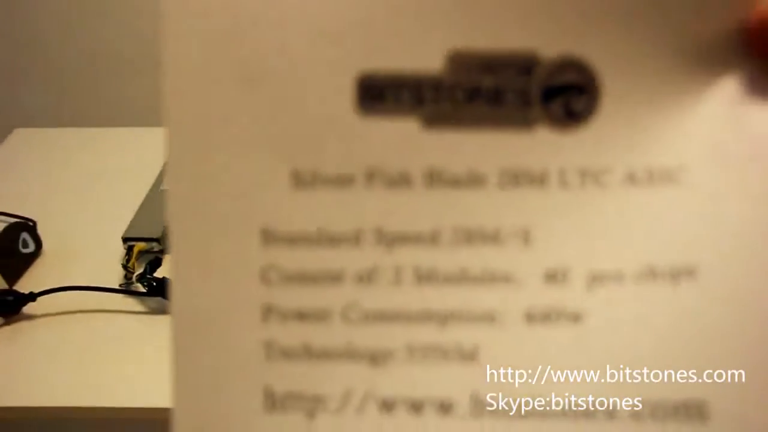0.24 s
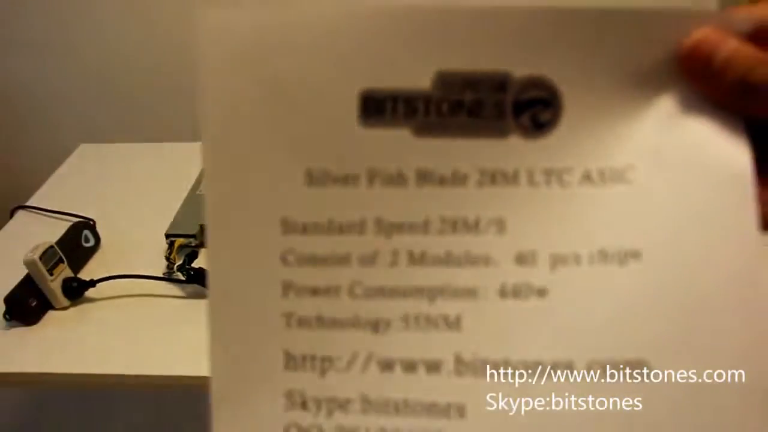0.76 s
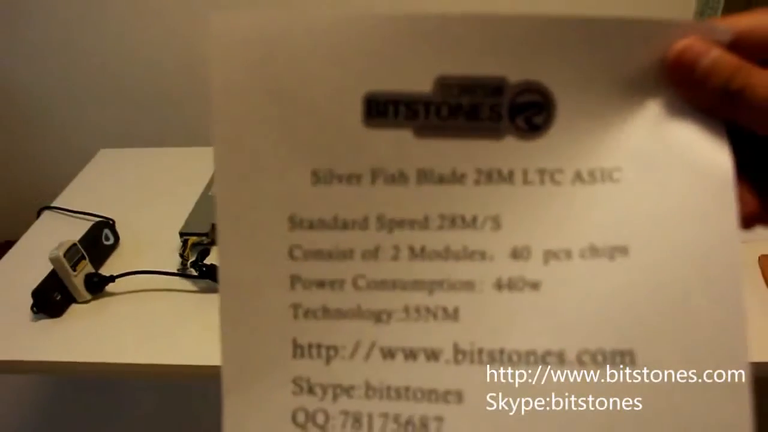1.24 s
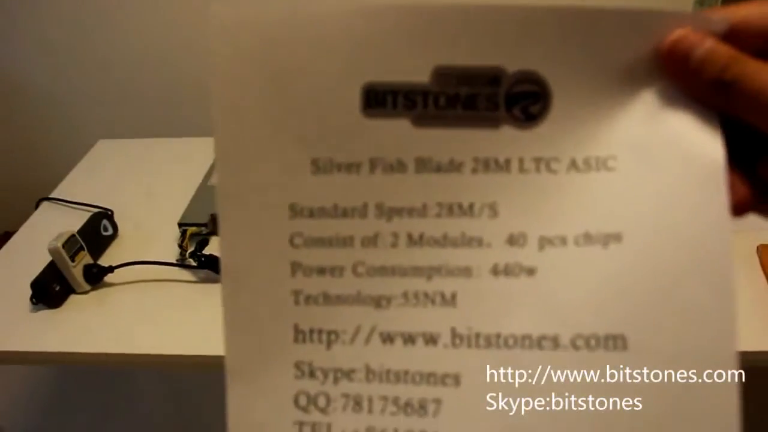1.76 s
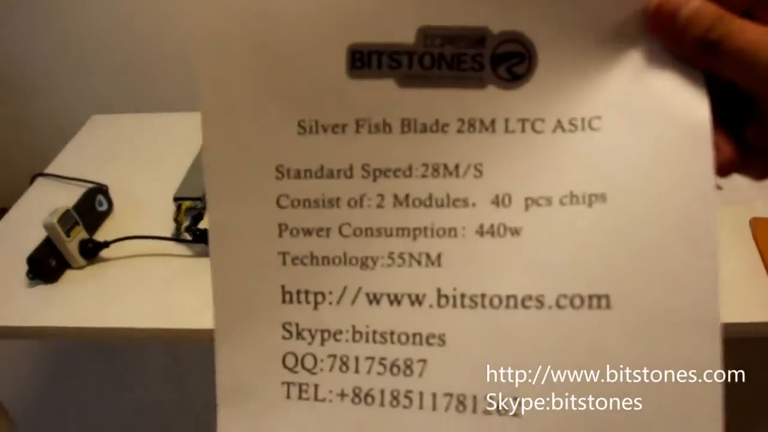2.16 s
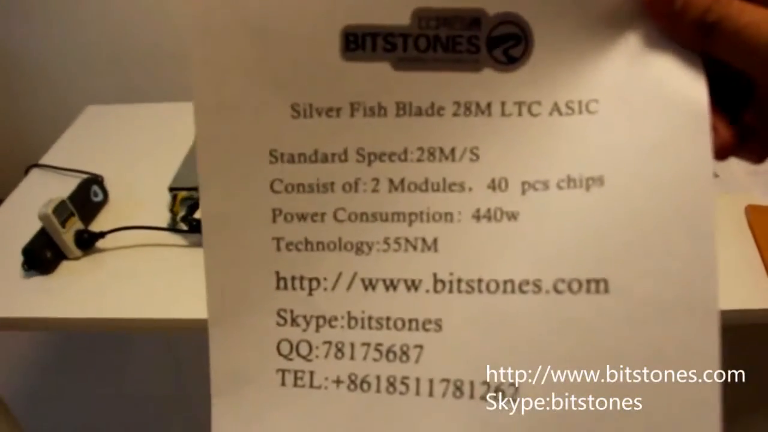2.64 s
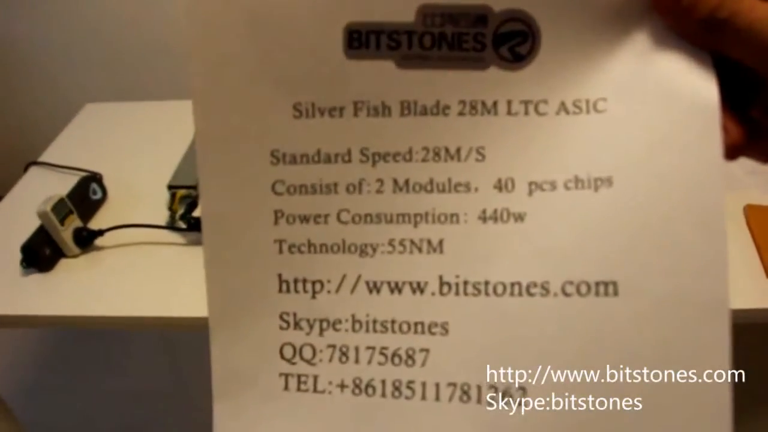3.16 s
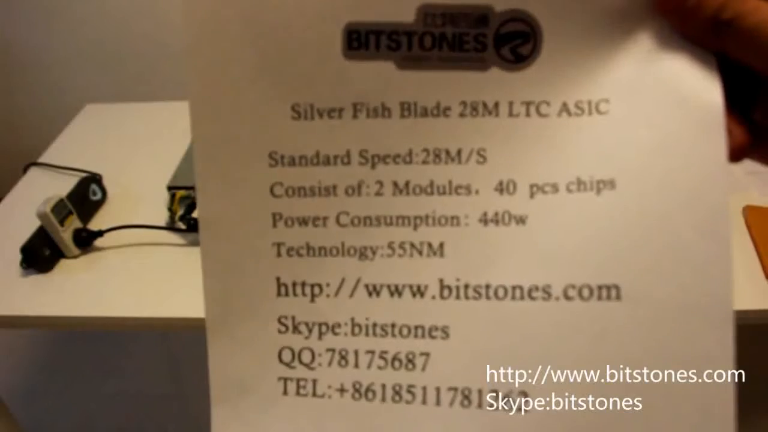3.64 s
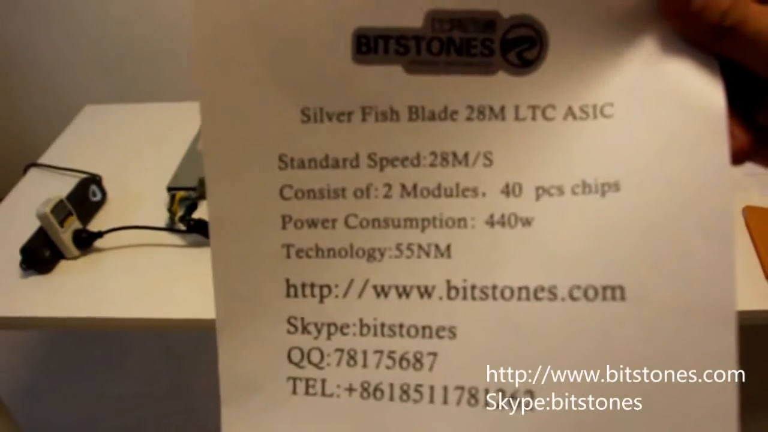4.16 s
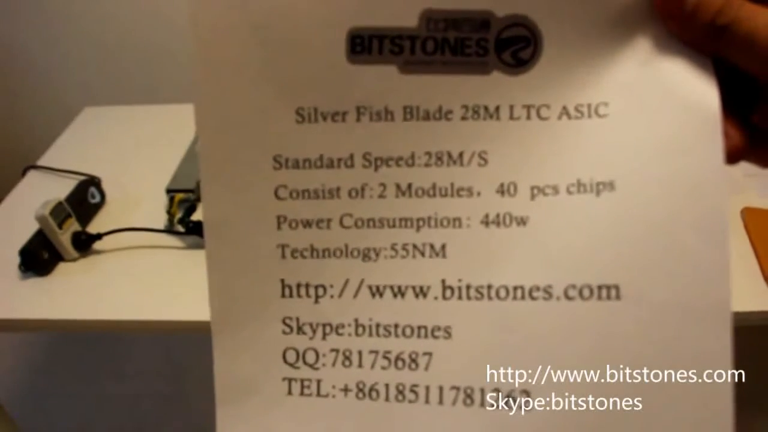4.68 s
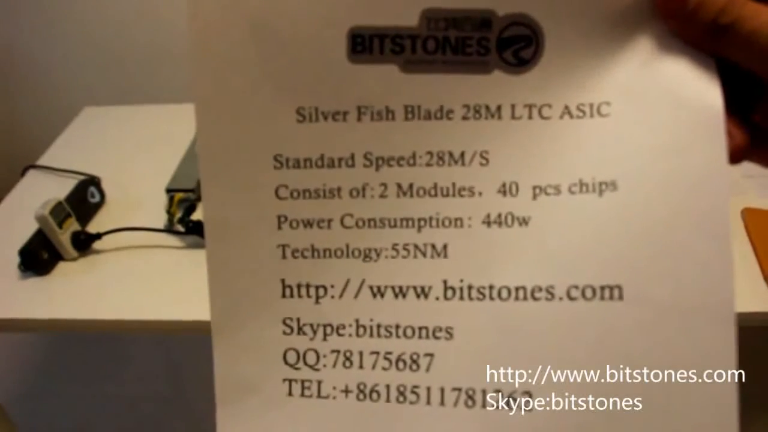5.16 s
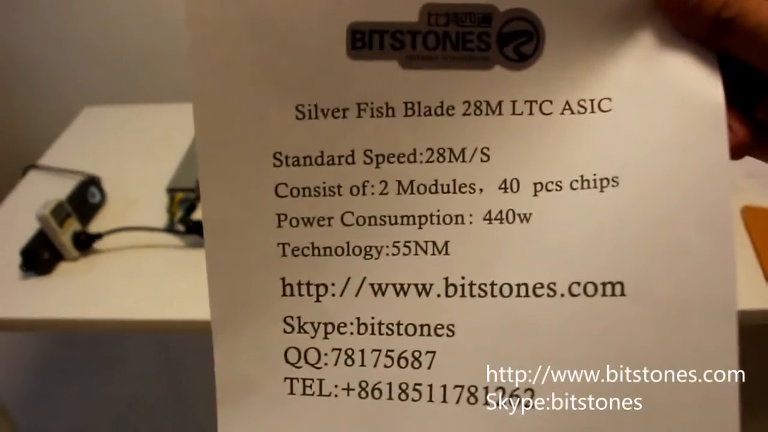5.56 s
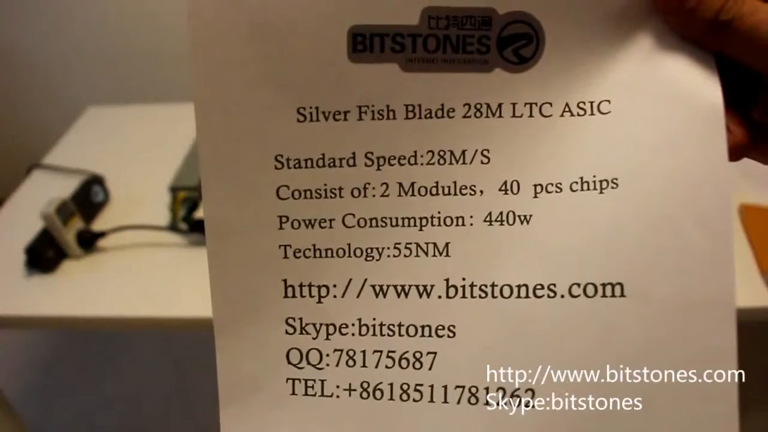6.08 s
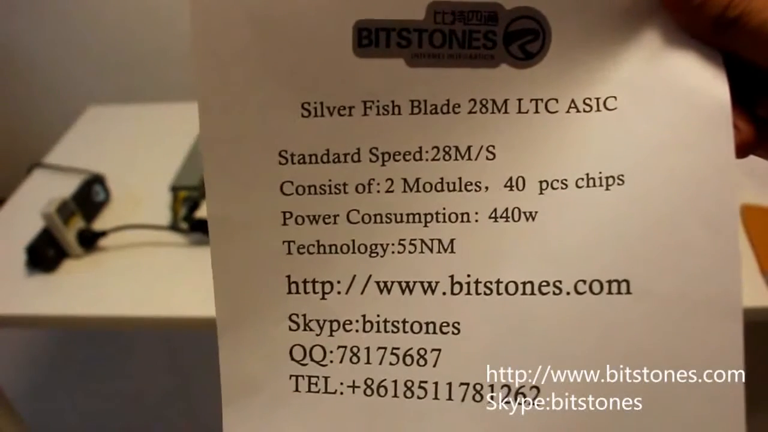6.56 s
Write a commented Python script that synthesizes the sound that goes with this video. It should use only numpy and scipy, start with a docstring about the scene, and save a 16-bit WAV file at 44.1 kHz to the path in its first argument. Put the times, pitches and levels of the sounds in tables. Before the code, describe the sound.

From 0 seconds, two small multi-bladed cooling fans in a computing box on a desk are already running flat out in a small room, and they continue unchanged to the end at about 6.8 seconds. Their main whines sit close together near 675 and 700 hertz, with overtones around 1.4, 2 and 2.8 kilohertz, beating about 23 times a second as a rough, fluttering buzz. An even, wide rush of air fills in around them, strongest in the middle range, with little deep bass and dull at the very top. A faint low burble of short gliding tones, mostly around 300 to 450 hertz, flickers underneath. Between about 1.7 and 2.4 seconds the hand-held microphone eases back and the overtone balance shifts. Single tones dip and swell throughout, notably near 2.7, 3.5 and 6 seconds, while overall loudness stays nearly constant.

```python
"""From the start two seven-bladed cooling fans of a computing box run flat out on a desk in a small room.
Each is a set of sines locked to its shaft; speeds 3% apart drift, so the whines beat about 23 times a second.
Under them lie an even rush of air, made of coloured noise, and a faint low burble of short gliding sines.
At 1.72 s the hand-held microphone eases back for 0.65 s, and the balance of the overtones shifts.
To the end, single lines dip and swell as it passes nodes and crests of standing waves."""
import sys
import numpy as np
from scipy import signal
from scipy.fft import rfft, irfft, next_fast_len
from scipy.io import wavfile
from scipy.ndimage import uniform_filter1d, map_coordinates

SR = 44100
rng = np.random.default_rng(int(sys.argv[2]) if len(sys.argv) > 2 else 0)


def put_to_file(sound):
    """Save the sound as 16-bit audio at rate SR, in the file named by the first command-line argument."""
    columns = np.atleast_2d(sound).T  # one column per channel
    safe = np.clip(columns, -1, 1)
    whole_steps = np.round(safe * 32767)
    wavfile.write(sys.argv[1], SR, whole_steps.astype(np.int16))


N = 300762

BLADES = 7
# fan speed: time_s, blade_pass_hz
SLOW_SPEED = [(0, 677.7), (0.4, 676.9), (1.05, 679.0), (3.2, 674.6), (5, 674.8), (5.6, 675.5),
              (6.82, 673.5)]
FAST_SPEED = [(0, 699.2), (1.8, 698.9), (2.75, 700.8), (3.6, 698.5), (4.8, 697.6), (5.8, 699.5),
              (6.82, 696.7)]
# whine: blade_pass_harmonic, first_place_db, second_place_db, left_minus_right_db
SLOW_WHINE = [(1, -35.8, -37.7, -2.2), (2, -33.7, -37.5, 1.9), (3, -48.5, -40.8, 1.3), (4, -40, -37, 2.1)]
FAST_WHINE = [(1, -31.2, -30.3, .7), (2, -41.7, -40.6, -.2), (3, -49, -45.5, -7), (4, -41, -39.5, .7)]
# weaker lines from unequal blades and the motor: shaft_multiple, level_db (before shaft_db)
SLOW_ORDERS = [(5, -51), (6, -49), (8, -46.5), (9, -49), (11, -53), (12, -54), (32, -55), (35, -55),
               (42, -55), (49, -60), (56, -61), (63, -51)]
FAST_ORDERS = [(6, -42), (9, -45.5), (12, -52), (16, -52), (18, -53), (35, -52.5), (42, -55), (63, -48.3)]
# standing-wave nodes (-) and crests (+) crossed: centre_s, half_length_s, shaft_multiple, change_db
SLOW_CROSSINGS = [(.4, .35, 7, 2), (.45, .25, 28, 2), (1.1, .55, 12, 11), (1.25, .55, 28, -10),
                  (1.3, .2, 5, 6), (1.85, .35, 5, 9), (2.35, .5, 14, 4.5), (2.85, .25, 28, 2),
                  (3.5, .35, 14, -10), (3.5, .2, 8, 7), (3.65, .25, 6, 6), (4.42, .15, 14, -6),
                  (4.55, .4, 8, 8), (4.75, .45, 6, 5), (5.45, .6, 7, 2.5), (5.5, .3, 28, 3),
                  (5.65, .3, 14, 3), (6.2, .1, 14, -12), (6.5, .3, 21, -4), (6.55, .35, 28, -7),
                  (6.55, .4, 7, -3), (6.55, .22, 6, 10)]
FAST_CROSSINGS = [(1.83, .18, 14, 6), (2.2, .25, 28, -4), (2.3, .3, 21, 6), (2.62, .22, 7, -4.5),
                  (2.68, .14, 14, -15), (2.7, .5, 28, -11), (3.1, .17, 7, -7), (3.15, .33, 14, 5),
                  (3.53, .2, 9, 7), (4.9, .45, 9, 5), (5.75, .35, 14, 4.5), (5.9, .2, 7, -3.8),
                  (5.9, .22, 28, -9), (6.65, .3, 14, -4.5)]
ORDER_PAN_SCATTER_DB = 2.5
# likeness of left and right: pitch_hz, likeness (0 to 1)
ALIKE = [(250, 1), (480, 1), (570, 0.89), (740, 0.98), (1000, 0.88), (1700, 0.83), (2500, 0.68),
         (3500, 0.67), (5000, .53), (6500, 0.47)]
# rush of air through the heat sinks: pitch_hz, relative_density_db
AIR_COLOUR = [(470, -6.5), (520, 1), (900, 0.53), (1400, 0.7), (1900, -0.5), (3100, -3), (4400, -6.5),
              (5200, -7), (6430, -9.5), (6520, -19.5), (7000, -33)]
# resonances (+) and reflection notches (-) of case and desk: centre_hz, width_hz, change_db
CASE_COLOUR = [(485, 25, 3), (512, 18, -4), (536, 24, 4.5), (585, 40, 2.5), (640, 25, -1.5), (725, 30, -2),
               (875, 55, 3.4), (950, 60, 2.6), (1025, 40, -1), (1065, 40, 1), (1145, 70, 1.5),
               (1235, 50, 2), (1560, 70, -1.7), (1900, 80, -1.3), (2120, 140, 1), (2620, 60, -1.3),
               (2900, 300, 1.5), (3180, 130, 2.3), (4060, 220, 3)]
LOW_EDGE_HZ, EDDY_DB = 462, 0.6
# upper rush at the microphone's two places
SHADE_FIRST_DB, SHADE_SECOND_DB = 0.9, 1.2
MOVE_START_S, MOVE_LENGTH_S = 1.72, 0.65
# strongest low blips: centre_s, pitch_hz, peak_db (before level_db)
STRONG_BLIPS = [(.15, 293, -42), (.28, 312, -43), (.5, 293, -45), (.67, 293, -43), (.79, 310, -45),
                (.97, 366, -39), (1.03, 304, -43), (1.26, 299, -44), (1.34, 262, -43), (1.35, 361, -41),
                (1.54, 295, -40), (1.68, 304, -43), (1.81, 275, -45), (1.89, 310, -41), (1.97, 361, -40),
                (2.08, 310, -42), (2.17, 393, -37), (2.28, 300, -44), (2.41, 275, -45), (2.54, 326, -43),
                (2.62, 312, -44), (2.75, 299, -45), (2.86, 301, -41), (2.94, 304, -42), (3.15, 307, -41),
                (3.48, 353, -43), (3.82, 312, -44), (3.94, 291, -45), (4.14, 304, -39), (4.25, 222, -46),
                (4.29, 310, -42), (4.67, 299, -46), (5, 388, -37), (5.13, 404, -37), (5.19, 304, -43),
                (5.42, 304, -43), (5.57, 293, -45), (5.65, 304, -42), (5.8, 371, -39), (5.81, 255, -44),
                (6.38, 312, -45), (6.46, 299, -43), (6.63, 299, -37)]
# weak random blips: pitch_hz, pitch_scatter_hz, rate_per_s, peak_db (before scatter and level_db)
WEAK_BLIPS = [(348, 16, 4.5, -44.5), (396, 12, 6, -44.5), (458, 14, 6, -43)]
BLIP_S, WEAK_SCATTER_DB, GLIDE_SCATTER_HZ_PER_S = 0.1, 2.5, 350
TOP_HZ = 7100


def amp(db):
    """Decibels to gain."""
    return 10 ** (np.asarray(db) / 20)


def unit(x):
    """x at rms 1."""
    return x / np.sqrt(np.mean(x ** 2) + 1e-20)


def along(points, hz):
    """Value at hz from (pitch_hz, value) points, read on a log axis."""
    point_hz, values = np.transpose(points)
    return np.interp(np.log(hz + 1), np.log(point_hz + 1), values)


def curve(rows):
    """One value per sample from (time_s, value) rows."""
    time_s, values = np.transpose(rows)
    return np.interp(np.arange(N) / SR, time_s, values)


def wobble(rate_hz):
    """Smooth random curve, rate_hz knots a second."""
    knots = rng.standard_normal(int(N * rate_hz / SR) + 4)
    return map_coordinates(knots, [np.arange(N) * rate_hz / SR], order=2, mode="nearest")


def filtered(x, response):
    """x times a gain that depends on frequency."""
    size = next_fast_len(N + SR // 2)
    hz = np.fft.rfftfreq(size, 1 / SR)
    return irfft(rfft(x, size) * response(hz), size)[..., :N]


def spread(hz):
    """Mid-side angle: the microphone's two ports agree less as the pitch rises."""
    return np.arccos(np.clip(along(ALIKE, hz), 0, 1)) / 2


def moved(first_db, second_db):
    """Level that follows the microphone from its first place to its second."""
    progress = np.clip((np.arange(N) / SR - MOVE_START_S) / MOVE_LENGTH_S, 0, 1)
    return first_db + (second_db - first_db) * progress


def standing_wave(crossings, order):
    """dB by which one line dips or swells as the microphone passes nodes and crests."""
    t = np.arange(N) / SR
    return sum(db * np.exp(-((t - centre_s) / half_s) ** 2)
               for centre_s, half_s, line, db in crossings if line == order)


def tone(phase, hz, flutter_db, pan_db, width):
    """Stereo line of rms about 1: turbulent inflow shakes its strength, reflections part the ports' phases."""
    sides = np.array([[0.5], [-0.5]])
    lead_rad = width * np.tan(spread(hz)) * wobble(0.7)
    gain = amp(flutter_db * wobble(14) + sides * pan_db)
    return np.sqrt(2) * gain * np.sin(phase + sides * lead_rad)


def fan(speed, whine, crossings, orders, shaft_db, flutter_db, wander_db):
    """One rotor: blade-pass harmonics and weaker shaft orders, all locked to its turning."""
    shaft_hz = curve(speed) / BLADES
    angle = 2 * np.pi * np.cumsum(shaft_hz) / SR
    lines = [(BLADES * round(harmonic), moved(first_db, second_db), pan_db)
             for harmonic, first_db, second_db, pan_db in whine]
    for order, db in orders:
        level_db = db + shaft_db + wander_db * wobble(2.5)
        lines.append((order, level_db, rng.normal(0, ORDER_PAN_SCATTER_DB)))
    total = np.zeros((2, N))
    for order, level_db, pan_db in lines:
        phase = order * angle + rng.uniform(0, 2 * np.pi)
        # lines up to twice the blade pass flutter more with pitch
        line_flutter_db = flutter_db * min(order / BLADES, 2)
        line = tone(phase, order * shaft_hz.mean(), line_flutter_db, pan_db, width=0.96)
        total += amp(level_db + standing_wave(crossings, order)) * line
    return total


def rush(colour_db, patchy_db):
    """Stereo noise of rms 1 with a given colour, slightly uneven in time and pitch."""
    cells = signal.stft(rng.standard_normal((2, N)), nperseg=512)[2]
    eddies = uniform_filter1d(rng.standard_normal(cells.shape[1:]), size=5, axis=0)
    eddies = uniform_filter1d(eddies, size=40, axis=1)
    pair = signal.istft(cells * amp(patchy_db * unit(eddies)), nperseg=512)[1][:, :N]

    def mid_side_gain(hz):
        """Colour shared between mid and side."""
        return amp(colour_db(hz)) * np.array([np.cos(spread(hz)), np.sin(spread(hz))])

    mid, side = filtered(pair, mid_side_gain)
    return unit(np.array([mid + side, mid - side]))


def air(level_db, shade_hz, shade_width_hz):
    """Turbulence in fins and grilles, coloured by the case and by the microphone's place."""
    def colour_db(hz):
        """Air and case colour above a steep low edge."""
        case_db = sum(db * np.exp(-2 * ((hz - centre_hz) / width_hz) ** 2)
                      for centre_hz, width_hz, db in CASE_COLOUR)
        edge_db = -10 * np.log10(1 + (LOW_EDGE_HZ / np.maximum(hz, 100)) ** 80)
        return along(AIR_COLOUR, hz) + case_db + edge_db

    flow = rush(colour_db, patchy_db=EDDY_DB)
    upper = filtered(flow, lambda hz: np.exp(-((hz - shade_hz) / shade_width_hz) ** 2))
    shade_db = moved(SHADE_FIRST_DB, SHADE_SECOND_DB)
    return amp(level_db) * (flow + (amp(shade_db) - 1) * upper)


def reflected(x, strength, longest_s, count=10):
    """Desk and walls return weak delayed copies that ripple the spectrum of the rush."""
    delays_s = rng.uniform(0.004, longest_s, count)
    signs = rng.choice([-1, 1], count)
    copies = sum(sign * np.roll(x, round(s * SR), axis=-1) for s, sign in zip(delays_s, signs))
    return (x + strength * copies) / np.sqrt(1 + count * strength ** 2)


def warble(level_db):
    """Faint low burble of short, soft gliding sines: stronger ones with gaps, weak ones at random."""
    t = np.arange(round(BLIP_S * SR)) / SR
    swell = np.sin(np.pi * t / BLIP_S) ** 2
    blips = list(STRONG_BLIPS)
    for pitch_hz, scatter_hz, rate_hz, db in WEAK_BLIPS:
        count = round(rate_hz * N / SR)
        moments_s = (np.arange(count) + rng.uniform(0, 1, count)) / rate_hz
        for s in moments_s:
            blip_hz = pitch_hz + scatter_hz * rng.standard_normal()
            blips.append((s, blip_hz, db + WEAK_SCATTER_DB * rng.standard_normal()))
    total = np.zeros(N + len(t))
    for s, pitch_hz, db in blips:
        hz = pitch_hz + GLIDE_SCATTER_HZ_PER_S * rng.standard_normal() * (t - BLIP_S / 2)
        blip = swell * np.sin(2 * np.pi * np.cumsum(hz) / SR)
        start = min(round(s * SR), N)
        total[start:start + len(t)] += amp(db + level_db) * blip
    return total[len(t) // 2:][:N]  # centres each blip on its time


def scene():
    """Both fans over the air that they drive, the air a touch to the left, and the low burble."""
    slow = fan(SLOW_SPEED, SLOW_WHINE, SLOW_CROSSINGS, SLOW_ORDERS,
               shaft_db=-0.5, flutter_db=0.85, wander_db=1.5)
    fast = fan(FAST_SPEED, FAST_WHINE, FAST_CROSSINGS, FAST_ORDERS,
               shaft_db=-0.5, flutter_db=0.65, wander_db=1.0)
    flow = air(level_db=-24.0, shade_hz=3550, shade_width_hz=650)
    flow = reflected(flow, strength=0.063, longest_s=0.028)
    return slow + fast + flow * amp([[0.1], [-0.1]]) + warble(level_db=2.5)


def record(dry):
    """Band limit: nothing passes from TOP_HZ up."""
    return filtered(dry, lambda hz: hz < TOP_HZ)


dry = scene()
out = record(dry)
put_to_file(out)
```